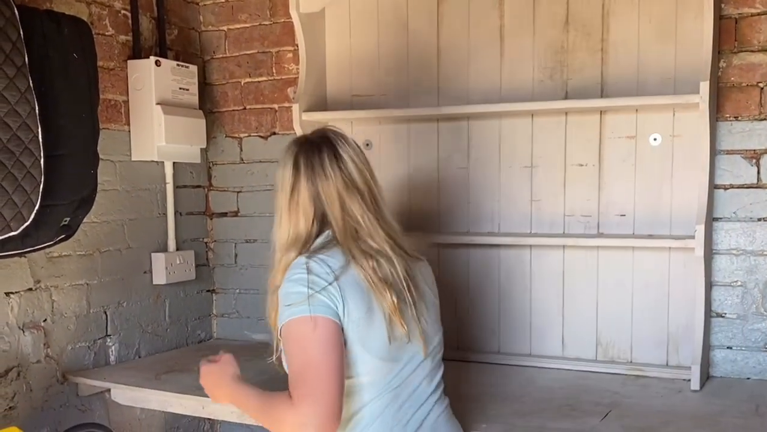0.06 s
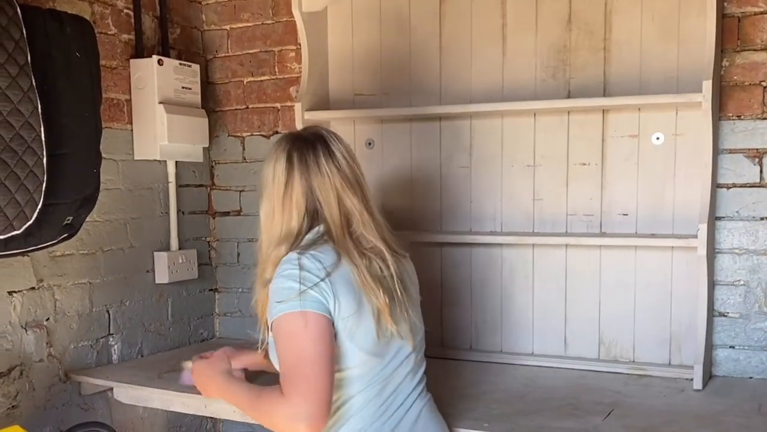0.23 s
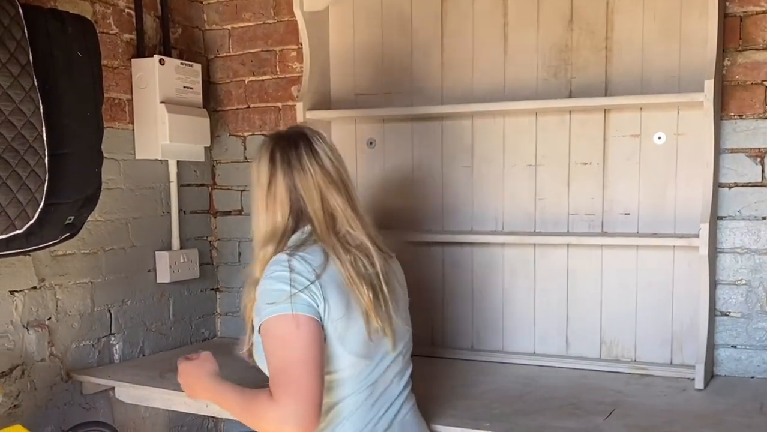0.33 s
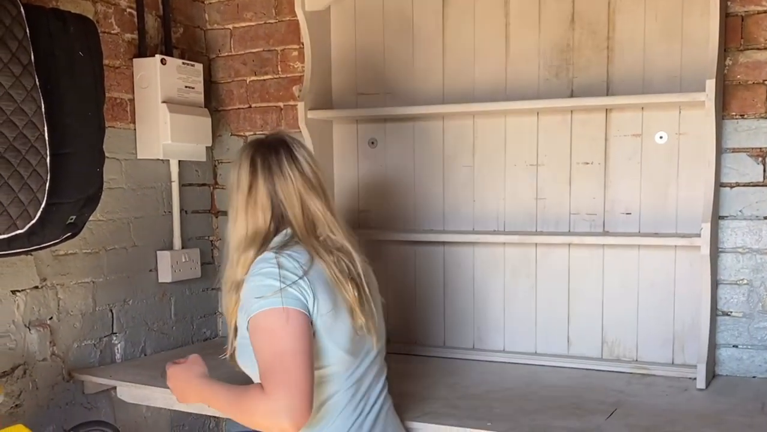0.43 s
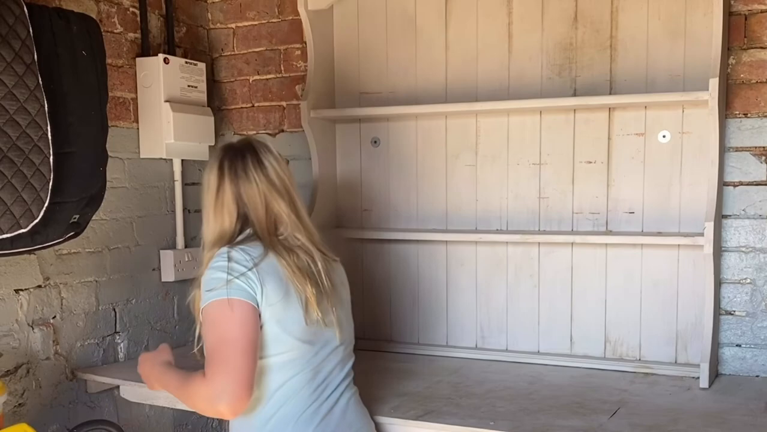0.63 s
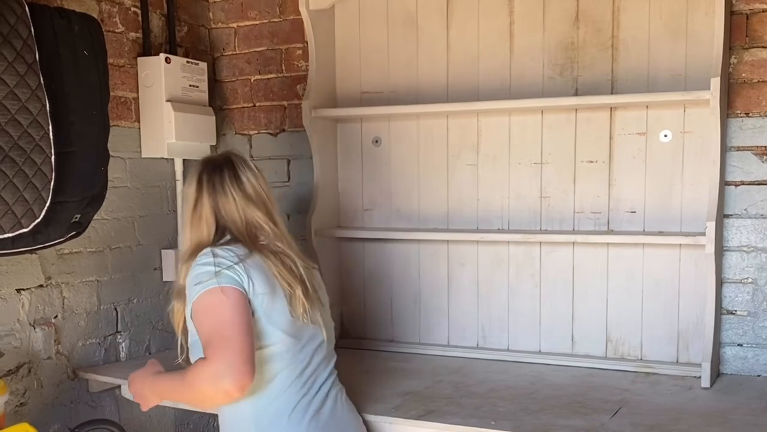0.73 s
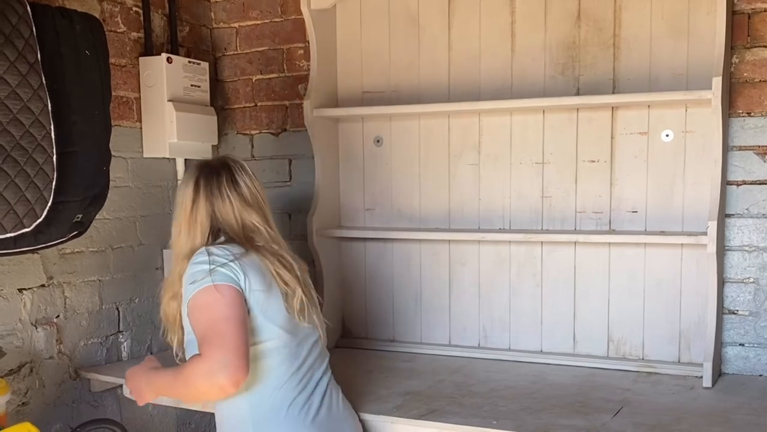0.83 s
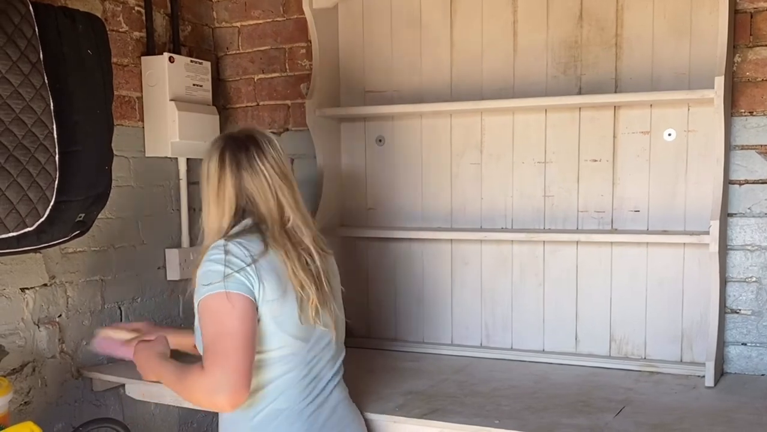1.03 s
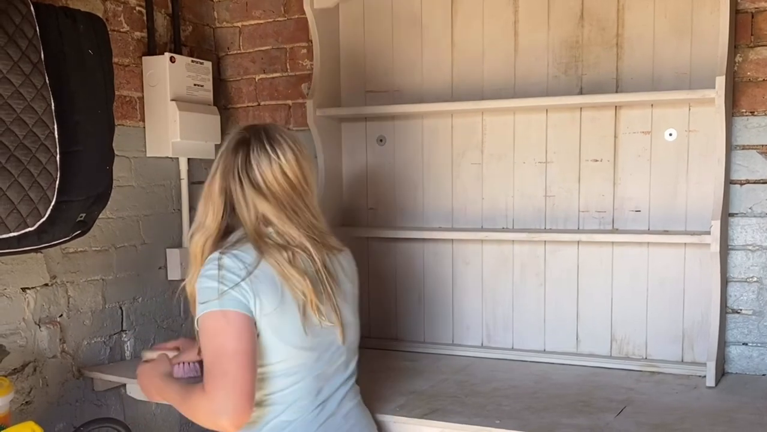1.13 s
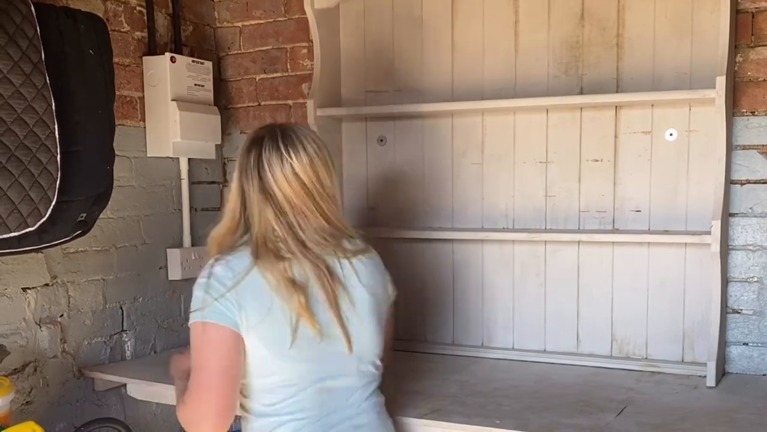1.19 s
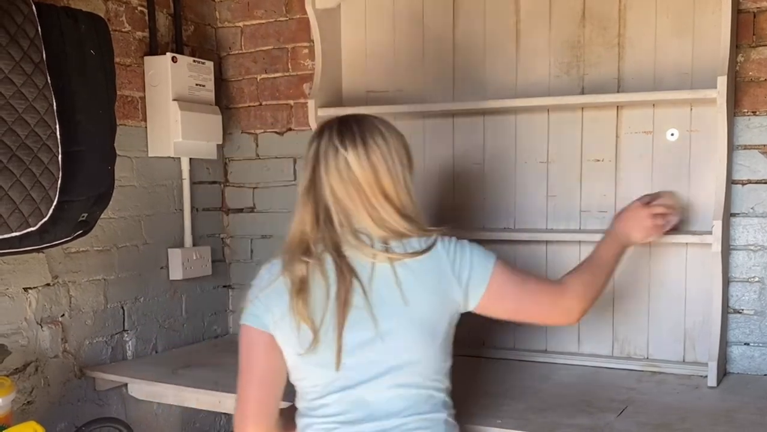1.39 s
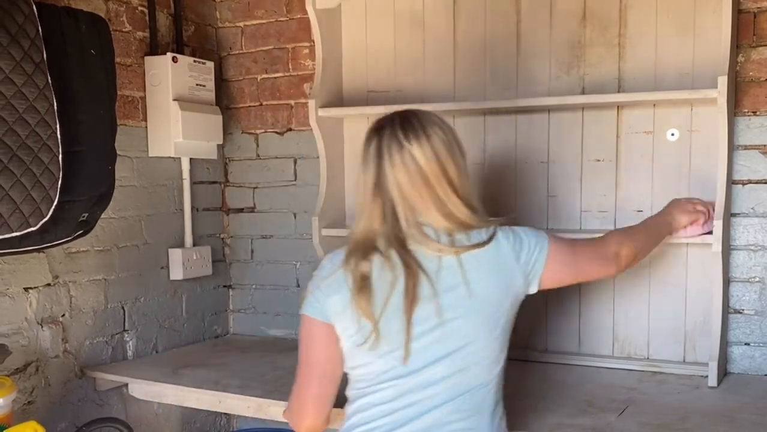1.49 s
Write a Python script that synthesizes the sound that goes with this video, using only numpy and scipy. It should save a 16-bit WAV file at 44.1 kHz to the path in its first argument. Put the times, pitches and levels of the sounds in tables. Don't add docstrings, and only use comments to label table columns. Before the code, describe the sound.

Stiff hand brush sweeping a hollow wooden shelf in quick strokes, with one hard woody knock

```python
import sys
import numpy as np
from scipy import signal
from scipy.fft import rfft, irfft, next_fast_len
from scipy.io import wavfile

SR = 44100
rng = np.random.default_rng(int(sys.argv[2]) if len(sys.argv) > 2 else 0)


def wav_record(signal):
    frames = np.transpose(np.atleast_2d(signal))
    bounded = np.clip(frames, -1, 1)
    quanta = np.round(bounded * 32767).astype(np.int16)
    wavfile.write(sys.argv[1], SR, quanta)


def volts_from_db(level):
    exponent = np.asarray(level, float) / 20
    return 10 ** exponent


N = 68355
T = np.arange(N) / SR
PAD = next_fast_len(N + SR // 2)
HZ = np.maximum(np.arange(PAD // 2 + 1) * SR / PAD, 1)
ATTACK_S = 0.006


def rms_one(x):
    return x / np.sqrt(np.mean(x ** 2) + 1e-20)


def at_hz(points, hz):
    table_hz, value = np.transpose(points)
    return np.interp(np.log(hz), np.log(table_hz), value)


def drift(rate):
    r = np.exp(-80 * np.pi * rate / SR)
    slow = signal.lfilter([1], [1, -2 * r, r * r], rng.standard_normal(N // 40 + 1002))[1000:]
    return np.interp(np.arange(N) / 40, np.arange(len(slow)), rms_one(slow))


def fade(start, t60):
    return (T >= start) * volts_from_db(-60 * np.maximum(T - start, 0) / t60)


# frequency in Hz, left-right likeness from 0 to 1.
PORT_LIKENESS = [(50, 0.23), (90, 0.98), (420, 0.99), (650, 0.66), (1000, 0.25), (11500, 0.11),
                 (13000, 0.87), (16000, 0.76)]


def spread(mid, side):
    alike = np.clip(at_hz(PORT_LIKENESS, HZ), 0, 1)
    return np.sqrt(1 + alike) * mid + np.sqrt(1 - alike) * side * [[1], [-1]]


def ring(force, hz, t60):
    r, w = volts_from_db(-60 / (t60 * SR)), 2 * np.pi * hz / SR
    turn = 0.45 * np.arccos(np.clip(at_hz(PORT_LIKENESS, hz), 0, 1)) * rng.choice([-1, 1])
    poles = [1, -2 * r * np.cos(w), r * r]
    ports = [signal.lfilter([np.sin(p), r * np.sin(w - p)], poles, force + 1e-18) for p in (turn, -turn)]
    return np.array(ports)


def colour(source, spectrum, patchy_db):
    mid, side = rfft(source, PAD) * volts_from_db(at_hz(spectrum, HZ))
    pair = spread(mid, side)
    place = 2 * np.log2(HZ / 30)
    out = 0
    for k in range(19):
        band = irfft(pair * np.maximum(1 - abs(place - k), 0), PAD)[:, :N]
        out = out + band * volts_from_db(patchy_db * drift(25))
    return rms_one(out)


def flicks():
    per_s, spread_db = 11000, 1
    sizes = volts_from_db(spread_db * np.minimum(rng.exponential(1, (2, N)), 5)) * rng.choice([-1, 1], (2, N))
    return sizes * (rng.random((2, N)) < per_s / SR)


# start in seconds, lift-off in seconds,
# hiss level in dB, change over the stroke in dB, scrape relative to the hiss in dB.
STROKES = [(-.05, 0.086, -28, -11.5, -19), (0.229, .275, -38.5, -1, -13.5),
           (0.271, 0.388, -29.5, -14.5, -11.5), (0.37, .48, -71, 7, -1.5), (0.479, .57, -35.5, -12.5, 1.5),
           (.565, 0.683, -32.5, -10.5, -12.5), (.69, .79, -60.5, -8.5, 2.5), (0.787, .99, -43, 3, -6),
           (0.976, 1.02, -48.5, 9, -2.5), (1.021, 1.115, -37, -5.5, -14.5), (1.119, 1.215, -70.5, -1, 3.5),
           (1.217, 1.294, -38.5, -5, -14.5), (1.294, 1.392, -74, 3.5, -1), (1.426, 1.441, -87, 0, 15.5),
           (1.45, 1.475, -76.5, -1, -7), (1.509, 1.528, -67.5, -4, -12.5), (1.541, 1.6, -44, -15.5, -7.5)]


def pressure():
    lift_db_per_s = 1042.5
    sheen_base_db, sheen_swing_db, sheen_follows = -5, 9, 0.24
    power = 0
    for start, lift, db, change_db, scrape_db in STROKES:
        rise = np.clip((T - start) / ATTACK_S, 0, 1)
        done = np.clip((T - start) / (lift - start), 0, 1)
        slide = rise * volts_from_db(db + change_db * done - lift_db_per_s * np.maximum(T - lift, 0))
        slow = 1 - np.sin(np.pi * done ** 2.0)
        sheen_db = sheen_base_db - sheen_swing_db * slow + sheen_follows * (db + 56.5)
        power = power + np.array([slide, slide * volts_from_db(sheen_db), slide * volts_from_db(scrape_db)]) ** 2
    return np.sqrt(power)


# frequency in Hz, level in dB per Hz.
HISS = [(700, -36), (1500, -14.5), (3500, -3.5), (6000, -0.5), (7500, -3), (9600, -0.5), (13000, -8),
        (16000, -18.5)]
SHEEN = [(5000, -10), (8500, -3.5), (11000, -10), (16000, 1.5)]
SCRAPE = [(300, -8.5), (700, 4), (1500, 2), (3000, -4), (6000, -14.5), (16000, -44.5)]


def bristles(slide, sheen, scrape):
    hiss = slide * colour(flicks(), HISS, patchy_db=1.0)
    top = sheen * colour(flicks(), SHEEN, patchy_db=-4.5)
    return hiss + top + scrape * colour(flicks(), SCRAPE, patchy_db=4.5)


# time in seconds, bristle slap in dB, woody clack in dB, t60 in seconds.
LANDINGS = [
    (0.238, -45, -23.5, 0.1),
    (0.2857, -31, -8.5, 0.079),
    (0.4833, -29.5, -22, 0.077),
    (0.576, -27.5, -55, 0.11),
    (0.676, -48, -37, 0.048),
    (0.789, -38.5, -47, 0.06),
    (0.989, -57, -32, 0.1),
    (1.117, -53.5, -36.5, 0.037),
    (1.223, -29.5, -25, 0.089),
]
# frequency in Hz, level in dB per Hz.
SLAP = [(900, -6), (2000, -2), (3500, 3), (5500, 7.5), (9000, -24), (16000, -23)]
CLACK = [(300, -9.5), (700, 1.5), (1200, -6), (2000, -13), (3500, -22.5), (7000, -41), (16000, -51.5)]


def landings():
    slap, clack = 0, 0
    for s, slap_db, clack_db, t60 in LANDINGS:
        fall = fade(s, t60)
        slap = slap + volts_from_db(slap_db) * fall
        clack = clack + volts_from_db(clack_db) * fall * np.clip((T - s) / ATTACK_S, 0, 1)
    return slap * colour(flicks(), SLAP, patchy_db=5.5) + clack * colour(flicks(), CLACK, patchy_db=0.5)


# time in seconds, level in dB, centre of the push in Hz, contact in seconds.
THUMPS = [(-.01, -27.5, 230, 0.0026), (.05, -44.5, 350, 0.0095), (.165, -65, 130, 0.015),
          (.259, -20.5, 392, 0.0033), (.31, -21.5, 441, 0.03), (.242, -14, 350, 0.0076),
          (.247, -20.5, 149, 0.018), (.482, -6.5, 229, 0.011), (.507, -21, 250, 0.012),
          (.518, -19, 225, 0.021), (.592, -20.5, 244, 0.029), (.486, -11.5, 460, 0.021),
          (.58, -27.5, 500, 0.0042), (.675, -36, 253, 0.0083), (.792, -23.5, 330, 0.0054),
          (.814, -23.5, 254, 0.0059), (.866, -37.5, 392, 0.0093), (.8, -22, 244, 0.25),
          (.482, -5.5, 381, 0.014), (.98, -42, 610, 0.0079), (1.003, -26.5, 486, 0.012),
          (1.02, -24.5, 503, 0.033), (1.11, -34, 210, 0.025), (1.15, -39.5, 235, 0.018),
          (1.2245, -16, 391, 0.003), (1.242, -16.5, 325, 0.019), (1.28, -23.5, 140, 0.018),
          (1.33, -34.5, 180, 0.0205), (1.37, -33, 193, 0.021), (1.395, -42.5, 139.7, 0.027),
          (.578, -25, 750, 0.0176), (.565, -26, 372, 0.029), (.86, -30, 770, .07), (.86, -34, 365, 0.083),
          (.995, -28, 1226, 0.019), (1.01, -35, 587, 0.021), (1.228, -22.5, 375, 0.011),
          (1.24, -30, 765, 0.0056), (1.26, -37.5, 513, 0.015), (1.12, -41.5, 452, 0.022),
          (.5, -23, 616, 0.0055), (.68, -40, 125, 0.036)]
# frequency in Hz, level in dB, t60 in seconds.
BOARD_MODES = [(110.5, -15, 0.5), (141.1, -1.5, 0.29), (193.6, -0.5, 0.15), (244, 2, 0.14),
               (329.2, -1, 0.071), (375.1, 2, 0.1), (456.3, -0.5, 0.079), (513.3, -8.5, 0.14),
               (587, -0.5, 0.046), (658, -8, 0.088), (764.7, 0.5, 0.077), (1000, -32, .07),
               (1226, -1, 0.062), (1450, -18, .06)]


def board(rub):
    push_octaves, short_contact_s = 0.93, 0.0087
    lead = SR // 10
    out, length = 0, N + lead
    luck = rng.normal(0, 1, (len(THUMPS), len(BOARD_MODES), 2))
    grit = rng.standard_normal((2, N))
    for m, (hz, mode_db, t60) in enumerate(BOARD_MODES):
        force = np.zeros(length)
        for k, (s, db, centre_hz, contact_s) in enumerate(THUMPS):
            i, n = int(s * SR) + lead, max(int(contact_s * SR), 8)
            push = np.hanning(n) * np.sin(2 * np.pi * hz * np.arange(n) / SR + luck[k, m, 0]) * 4 / n
            away = np.log2(hz / centre_hz) / push_octaves * max(1, contact_s / short_contact_s)
            force[i:i + n] += push * volts_from_db(db + luck[k, m, 1] - 4.4 * away ** 2)
        rub_db = 0.5 - 3 * np.log2(hz / 330) ** 2
        force[lead:] += grit[m % 2] * rub * volts_from_db(rub_db) * np.sqrt(28 / (t60 * SR))
        out = out + volts_from_db(mode_db - 4.5) * ring(force, hz, t60)[:, lead:]
    return out


# time in seconds, level in dB, brightness in dB per octave.
KNOCKS = [
    (0.287, -14, 11),
    (.2905, -4.5, -4.5),
    (0.296, -13.5, -1),
    (0.306, -22, 2),
]
# frequency in Hz, level in dB, t60 in seconds.
BLOCK_MODES = [(420, -11, 0.066), (693, -8, 0.052), (840.6, -11.5, 0.13), (998, -8, 0.034),
               (1088, 4.5, 0.044), (1302, -5, 0.037), (1468, 6, 0.034), (1635, -14.5, 0.072),
               (1990, -8, 0.032), (2370, -5.5, 0.021), (2680, -2.5, 0.01), (3010, -13, 0.021),
               (3620, -17, 0.018), (4550, -31.5, 0.017)]


def knock():
    grip_db_per_s2 = 2994
    s, db, tilt_db = np.transpose(KNOCKS)
    out, luck = 0, rng.normal(0, 1, (len(s), len(BLOCK_MODES)))
    for m, (hz, mode_db, t60) in enumerate(BLOCK_MODES):
        click_db = db + mode_db - 5 + tilt_db * np.log2(hz / 1100) + 1.5 * luck[:, m]
        clicks = np.zeros(N)
        clicks[(s * SR).astype(int)] = volts_from_db(click_db) * (-1) ** m
        out = out + ring(clicks, hz, t60)
    return out * volts_from_db(-grip_db_per_s2 * (T - s[0]) ** 2)


# time in seconds, level in dB, ring in Hz.
TICKS = [
    (1.352, -56, 3976),
    (1.448, -68.5, 8920),
    (1.5127, -47, 6830),
    (1.5125, -59.5, 13000),
    (1.5128, -53, 15300),
]


def ticks():
    out = 0
    for s, db, hz in TICKS:
        click = 1. * (np.arange(N) == int(s * SR))
        out = out + volts_from_db(db) * ring(click, hz, 0.0072)
    return out


def room(pair):
    t60_s, level_db, wall_cut_hz = 0.097, -20.5, 11000
    t = np.arange(SR // 2) / SR
    tail = rng.standard_normal((2, len(t))) * volts_from_db(-60 * t / t60_s) * (t > .006)
    mid, side = rfft(rms_one(tail) / np.sqrt(len(t)), PAD) / (1 + 1j * HZ / wall_cut_hz)
    return volts_from_db(level_db) * irfft(rfft(pair, PAD) * spread(mid, side), PAD)[:, :N]


# frequency in Hz, level in dB per Hz.
AIR = [(15, -41.5), (25, -27.5), (117, -3.5), (641, -21), (1100, -36), (1190, -35.5), (1650, -37.5),
       (2220, -44.5), (16000, -48.5)]


def background():
    return volts_from_db(-55) * colour(rng.standard_normal((2, N)), AIR, patchy_db=3.5)


def scene():
    slide, sheen, scrape = pressure()
    near = bristles(slide, sheen, scrape) + landings()
    near = near + board(scrape * volts_from_db(2 * drift(30))) + knock() + ticks()
    near = signal.sosfilt(signal.butter(4, 117.6, "high", fs=SR, output="sos"), near)
    return near + room(near) + background()


def band_limit(x):
    return signal.sosfilt(signal.butter(12, 16500, fs=SR, output="sos"), x)


# frequency in Hz, left minus right in dB.
PORT_LEAN = [(60, 2.5), (180, -0.5), (550, -2), (1650, 3), (4970, 0.5), (15000, 1)]


def record(dry):
    limit, top_hz, edge_hz = 1.3, 15900, 250
    lean = volts_from_db(.5 * at_hz(PORT_LEAN, HZ))
    ports = irfft(rfft(dry, PAD) * [lean, 1 / lean], PAD)
    rounded = limit * np.tanh(ports / limit)
    top_cut = np.clip((top_hz - HZ) / edge_hz, 0, 1) ** 2
    mix = irfft(rfft(rounded) * top_cut, PAD)[:, :N]
    return band_limit(mix)


dry = scene()
out = record(dry)
wav_record(out)
```